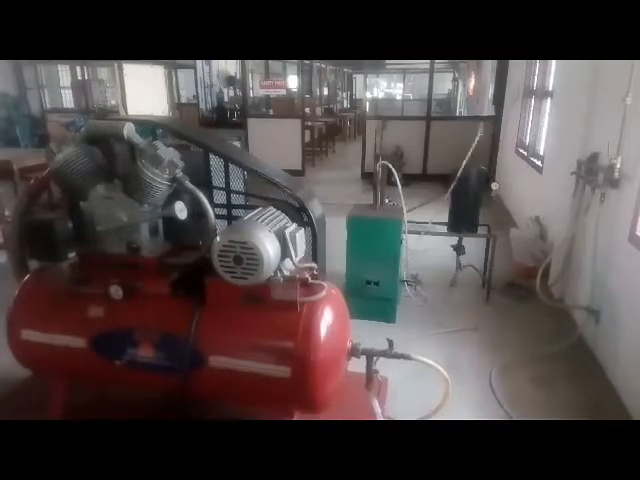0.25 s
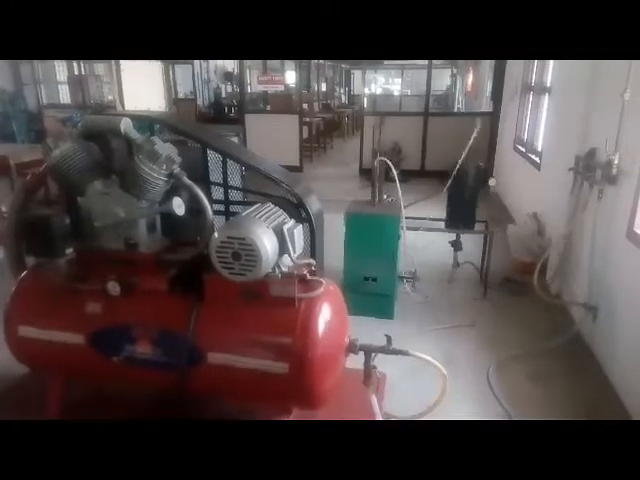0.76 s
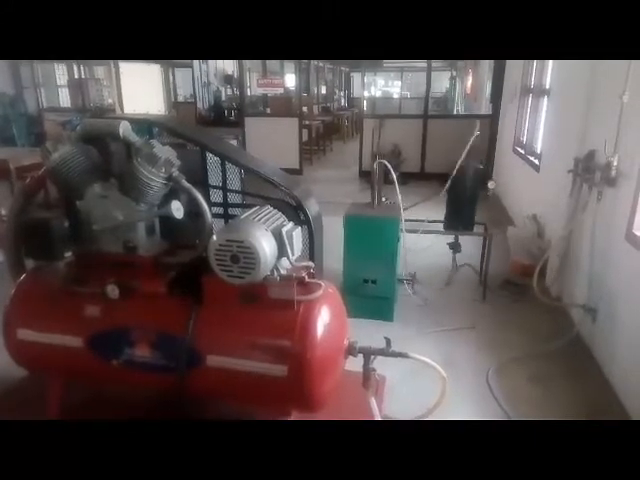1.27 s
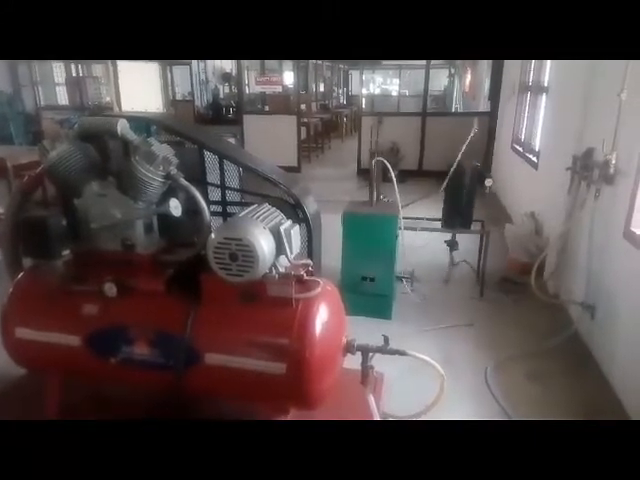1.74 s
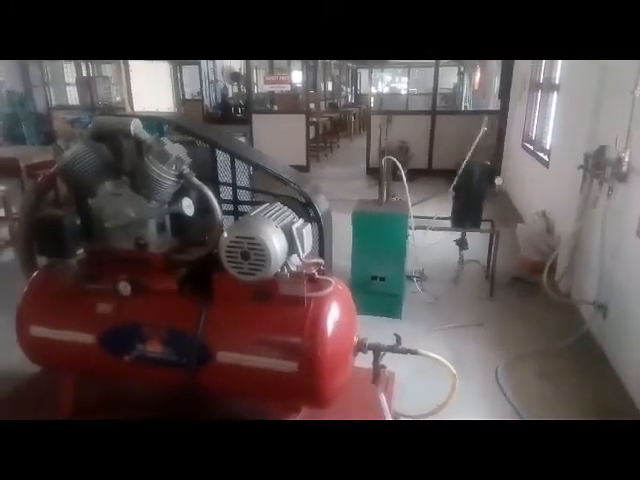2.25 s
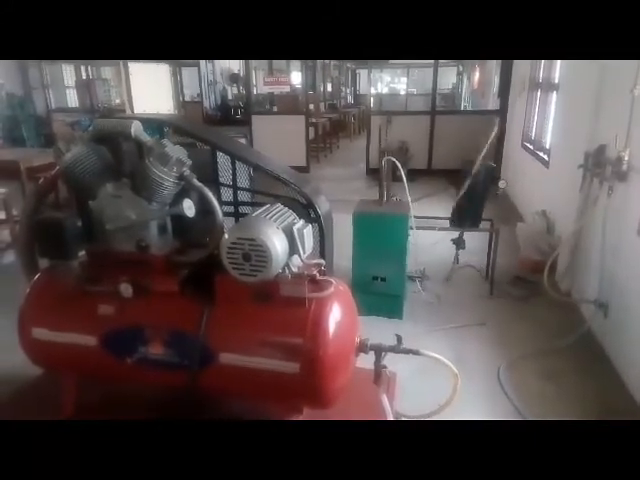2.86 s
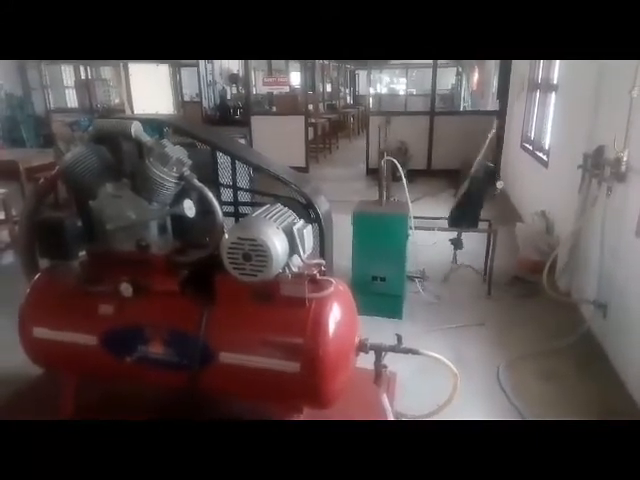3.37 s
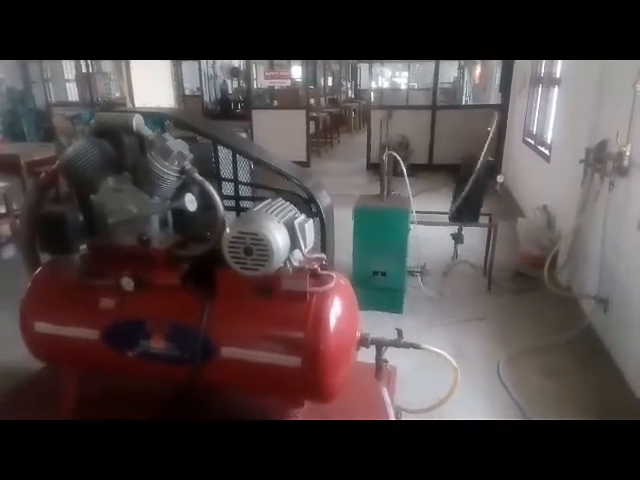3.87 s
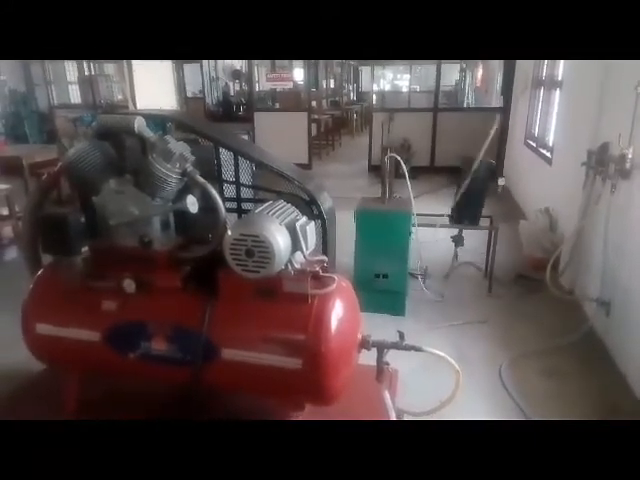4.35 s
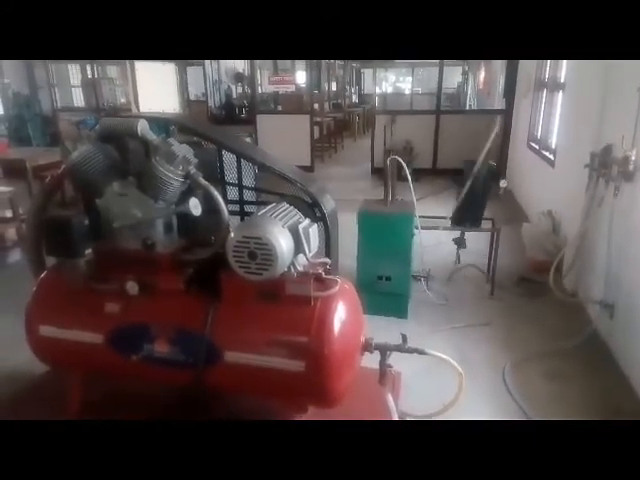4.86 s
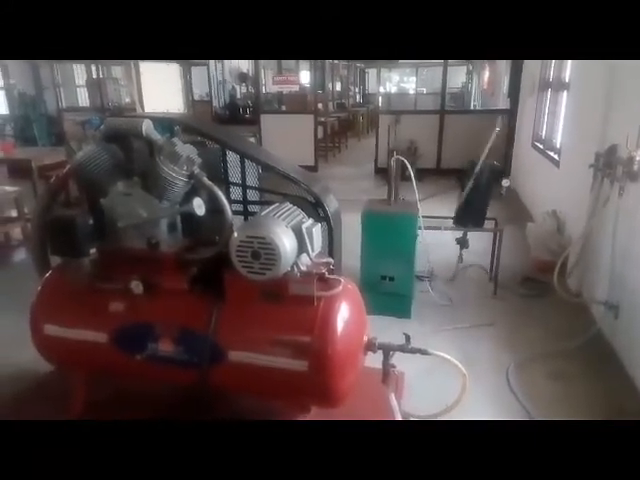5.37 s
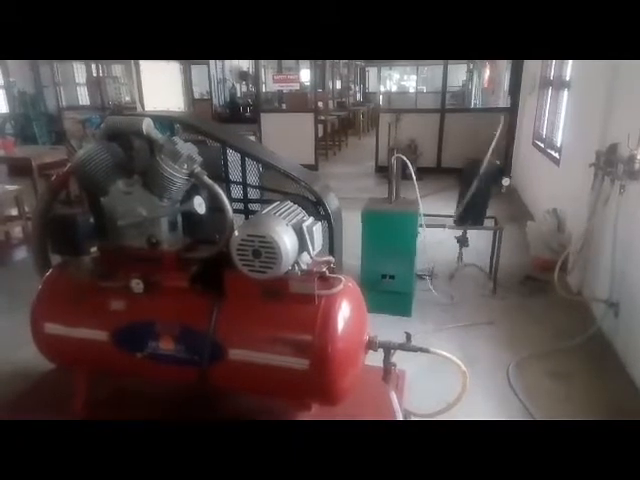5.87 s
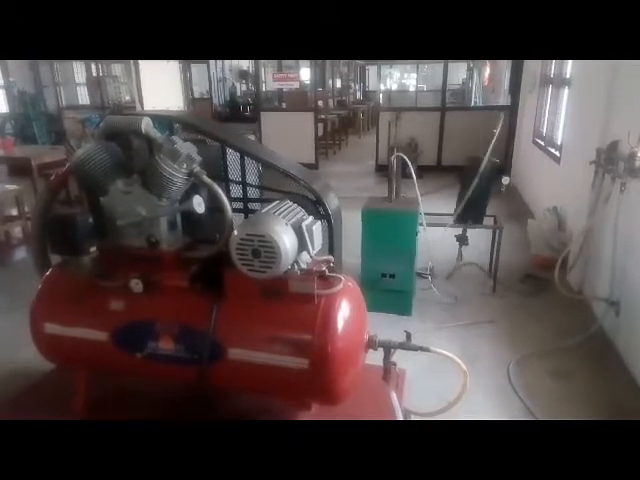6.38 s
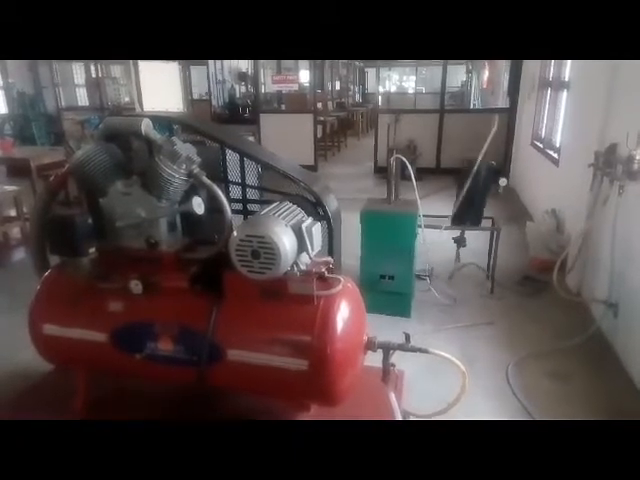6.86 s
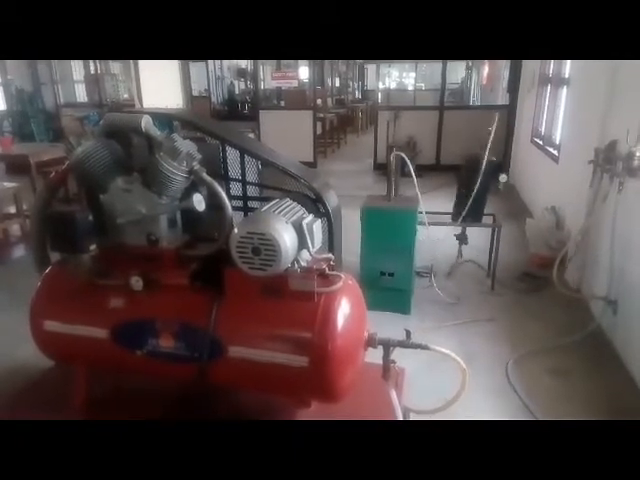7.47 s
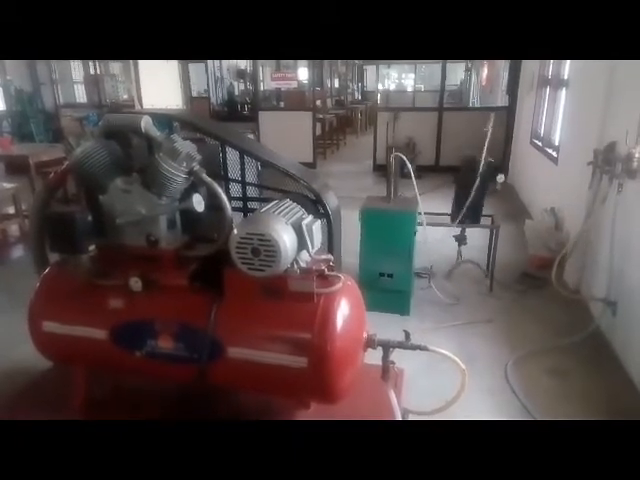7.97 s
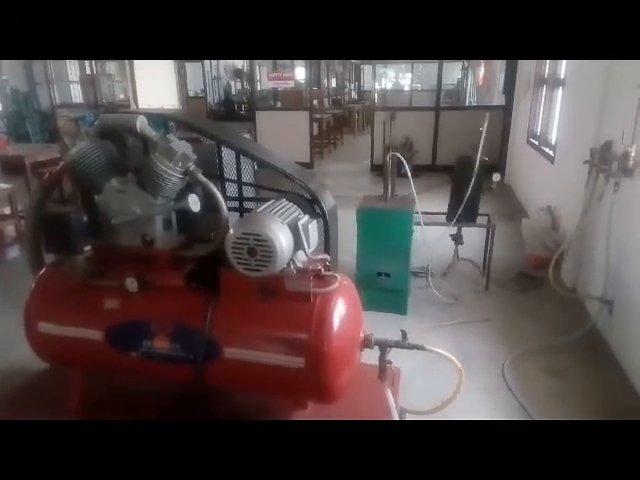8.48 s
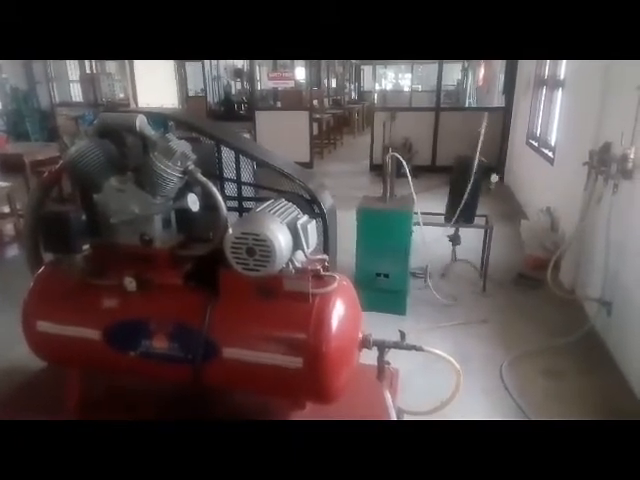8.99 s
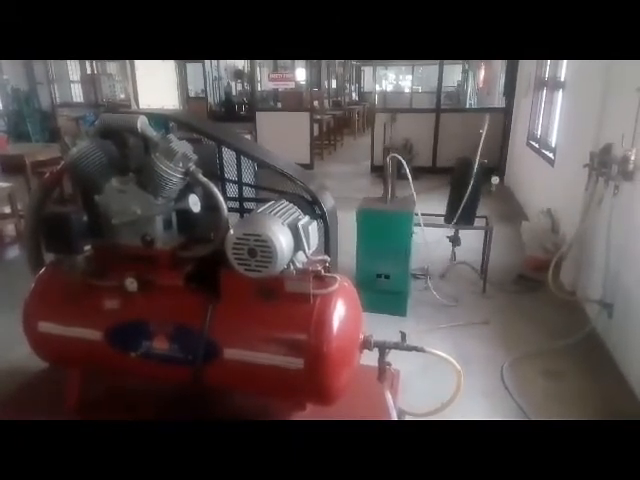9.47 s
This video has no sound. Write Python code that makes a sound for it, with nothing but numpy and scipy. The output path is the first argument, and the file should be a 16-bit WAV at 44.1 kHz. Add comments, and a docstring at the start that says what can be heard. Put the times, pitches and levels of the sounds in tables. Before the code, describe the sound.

Rhythmic metallic clatter from a running air compressor continues throughout, as a loose belt slaps, scuffs and bounces on its guard in an even, repeating pattern. Loose fittings tick and the rubber gives tiny squeaks. A low pulsing hum from the pump and motor and a constant rush of air lie beneath. The microphone is close, with the machine a little to the left, and the clatter echoes off hard walls.

```python
"""In a hard-walled laboratory, a belt-driven piston air compressor runs at a steady speed.
Its slack belt laps twice a second, slapping, knocking and scuffing, so the sheet-metal guard rings.
The pump hums at multiples of its crank speed and throbs against the tone of the motor's fan.
Air rushes through the intake and the fan, and the belt's clatter echoes off the walls."""
import sys
import numpy as np
from scipy import signal
from scipy.fft import rfft, irfft, next_fast_len
from scipy.io import wavfile

SR = 44100
rng = np.random.default_rng(int(sys.argv[2]) if len(sys.argv) > 2 else 0)


def wav_out(sig):
    """Save sig, one row per channel (or a flat mono array), as 16-bit PCM at SR to the path in sys.argv[1]."""
    wavfile.write(sys.argv[1], SR, np.round(np.clip(np.atleast_2d(sig).T, -1, 1) * 32767).astype(np.int16))


N = 429093
FFT_SIZE = next_fast_len(N + 2 * SR, real=True)
HZ = np.maximum(np.arange(FFT_SIZE // 2 + 1) * SR / FFT_SIZE, 1)
TIME = np.arange(N) / SR
SIDES = np.array([[1], [-1]])  # left, right; "pan" is how much louder the left is, "lead" how far ahead

# the belt slaps the guard once a lap:
# (time [s], force [dB], wait for the swing back [s], swing [dB], drag [dB], last brush [dB])
SLAPS = [(0.303, 2.5, 0.054, -1, -3, -12), (0.798, -2, 0.055, -2.5, 0, 1), (1.294, 1, 0.049, -7, 0, -6),
         (1.789, 1.5, 0.067, -6, -1, -6), (2.292, 0.5, 0.055, -3, 0, -8), (2.791, 0, 0.065, -4, -3, 3),
         (3.295, 0, 0.056, -1.5, -5, -6), (3.801, 1, 0.054, -4.5, -10, 9),
         (4.307, -15, 0.063, -5.5, -3, -11), (4.798, 0.5, 0.057, -0.5, 1.5, -1),
         (5.312, -6, 0.089, -7.5, -1, 6.5), (5.819, -3, 0.058, -2.5, 2, -3),
         (6.309, -0.5, 0.062, -6.5, -6, 9.5), (6.816, -5.5, 0.052, -8, 2, -6),
         (7.314, 0.5, 0.056, -3, -2, 2), (7.818, 0, 0.057, -1, -3, 6.5), (8.312, -1, 0.065, -2, 1.5, -10),
         (8.806, -5.5, 0.062, -0.5, -0.5, 3), (9.308, -4, 0.047, -4.5, 1.5, -3)]
# how alike the two ears hear each pitch: (frequency [Hz], likeness [1 or more = the same])
EAR_LIKENESS = [(50, 2), (400, 0.34), (800, 1), (1300, 0), (2200, -0.22), (4500, 0.1), (6500, -0.26),
                (9000, 0.14)]


def belt():
    """The belt's blows and rubbing make the guard ring, hiss, squeak and rattle."""
    slap_blows, slap_rub, slap_ring = slapping()
    knock_blows, knock_rub, knock_ring = knocking()
    rub, hiss = slap_rub + knock_rub
    # hypot adds a faint steady level between the touches
    slips = stick_slip(slips_per_s=1200, spread_db=2.0) * np.hypot(rub, from_db(-29.0))
    ringing = from_db(20.5) * guard(slips, vary_db=3.0)
    ringing += clack(slap_blows + knock_blows, level_db=23.5, vary_db=0.3)
    ringing += groan(rub, pitch_hz=749.7, waver_hz=20, level_db=-3.0, pan_db=4.0)
    hissing = friction(hiss, knock_hiss=knock_rub[1], flicker_db=1.5)
    shaking = from_db(-7.5) * np.hypot(hiss, from_db(-25.5))
    ticking = rattle(shaking, low_hz=1740, high_hz=5440, ring_s=0.0046, spread_db=13.5, count=3000)
    squeaking = squeaks(waver_hz=10, level_db=8.5, pan_db=8.5, lead=0.94)
    return ringing + slap_ring + knock_ring + hissing + ticking + squeaking


def slapping():
    """The belt slaps, swings back, drags and brushes off; gives blows, rubbing and bracket ring."""
    # now and then the rubbing belt catches and snaps against the guard: (time [s], strength [dB])
    snaps = [(0.387, -3.5), (1.586, -5.5), (2.587, 0.5), (3.883, 0), (4.388, -1), (5.098, -3), (5.366, -6),
             (6.106, 0.5), (6.899, -6), (7.372, -1.5)]
    slap_s, force_db, wait_s, swing_db, drag_db, brush_db = np.transpose(SLAPS)
    snap_s, snap_db = np.transpose(snaps)
    swing_s, drag_s, brush_s = slap_s + wait_s, slap_s + 0.0778, slap_s + 0.1363
    slap = touches(slap_s, -16.5, -16.0, rise_s=0.00095, hold_s=0.029, fade_s=0.28)
    swing = touches(swing_s, swing_db - 14, -20.0, rise_s=0.005, hold_s=0.0076, fade_s=0.059)
    drag = touches(drag_s, drag_db - 21, drag_db - 17.5, rise_s=0.0057, hold_s=0.022, fade_s=0.041)
    snap = touches(snap_s, snap_db - 17, snap_db - 17, rise_s=0.0012, hold_s=0.0048, fade_s=0.045)
    brush = touches(brush_s, brush_db - 27, brush_db - 24.5, rise_s=0.0043, hold_s=0.011, fade_s=0.066)
    blows = clicks(slap_s, force_db + 13.5) + clicks(swing_s, swing_db + 12)
    ring = pings(slap_s, -19.0, vary_db=2.5, detune=0.0052)
    ring += pings(swing_s, swing_db - 24.5, vary_db=3.5, detune=0.014)
    ring += pings(snap_s, snap_db - 17.5, vary_db=2.0, detune=0.0029)
    return soften(blows, cutoff_hz=3400), slap + swing + drag + snap + brush, ring


def knocking():
    """The belt grazes, knocks hard, scuffs and bounces; gives blows, rubbing and bracket ring."""
    # short bright knocks, half a lap from the slaps:
    # (time [s], force [dB], brightness [dB], wait for the scuff [s], scuff [dB], bounce [dB])
    knocks = [(0.045, -8.5, -20, 0.057, -6, -1), (0.536, -3, 1, 0.055, 2, -2.5),
              (1.041, -1.5, -1.5, 0.053, 1, 1.5), (1.53, 2.5, 0, 0.053, 2, -3),
              (2.032, -1, 0.5, 0.055, 1, 0.5), (2.537, -11, -3, 0.051, -4, -4),
              (3.035, -1, -1, 0.053, 1, -4), (3.536, -9, -4.5, 0.054, 0, -1.5),
              (4.04, 1, 0.5, 0.056, -3.5, 5), (4.535, -8, -2, 0.05, 3.5, 1),
              (5.043, -1, -1, 0.051, -3, 4.5), (5.556, 0.5, -1, 0.056, 4, -5),
              (6.05, -4, -5, 0.056, -3, -1.5), (6.556, 1, -1, 0.053, 1, -5),
              (7.052, -4, -2, 0.052, -4.5, 5.5), (7.559, -9, -0.5, 0.055, 3, 1.5),
              (8.061, -3, 2, 0.052, 1, -4), (8.544, -18, -2, 0.047, -3, 4),
              (9.05, -5.5, 3, 0.056, -0.5, -1), (9.543, -8, 2, 0.057, 1.5, 0)]
    knock_s, force_db, bright_db, wait_s, scuff_db, bounce_db = np.transpose(knocks)
    scuff_s = knock_s + wait_s
    bounce_s = scuff_s + 0.041
    graze = touches(knock_s - 0.036, -53, -26.0, rise_s=0.012, hold_s=0.028, fade_s=0.04)
    knock = touches(knock_s, force_db - 19, bright_db - 13, rise_s=0.0017, hold_s=0.0066, fade_s=0.088)
    scuff = touches(scuff_s, scuff_db - 14.5, 0.25 * scuff_db - 12.5,
                    rise_s=0.002, hold_s=0.0059, fade_s=0.15)
    bounce = touches(bounce_s - 0.008, bounce_db - 20.5, bounce_db - 22,
                     rise_s=0.0049, hold_s=0.013, fade_s=0.084)
    blows = clicks(knock_s, force_db + 14) + clicks(scuff_s, scuff_db + 6.5)
    blows += clicks(bounce_s, bounce_db + 5)
    ring = pings(knock_s, bright_db - 17, vary_db=3.5, detune=0.0013)
    ring += pings(scuff_s, -19.5, vary_db=2.0, detune=0.0066)
    ring += pings(bounce_s, bounce_db - 27, vary_db=3.5, detune=0.0057)
    return soften(blows, cutoff_hz=7050), graze + knock + scuff + bounce, ring


def touches(starts, rub_db, hiss_db, rise_s, hold_s, fade_s, vary_db=0.7):
    """The belt presses, holds and lets go (60 dB down in fade_s); gives two strengths: rub and hiss."""
    strengths = np.zeros((2, N))
    levels = np.transpose(np.broadcast_arrays(rub_db, hiss_db))
    levels = levels + vary_db * rng.standard_normal((len(starts), 2))
    for start, level_db in zip(starts, levels):
        near = slice(max(int(start * SR), 0), int(start * SR) + SR // 2)
        age = TIME[near] - start
        press = np.clip(age / rise_s, 0, 1)
        let_go = np.exp(-np.log(1000) * np.maximum(age - rise_s - hold_s, 0) / fade_s)
        strengths[:, near] += from_db(level_db)[:, None] * press * let_go
    return strengths


def clicks(starts, blow_db):
    """One click for each blow."""
    return np.bincount((starts * SR).astype(int), from_db(blow_db), N)[:N]


def soften(blows, cutoff_hz):
    """Rubber is soft, so its blows lose their treble."""
    return signal.sosfilt(signal.butter(1, cutoff_hz, fs=SR, output="sos"), blows + 1e-18)


def stick_slip(slips_per_s, spread_db):
    """Rubber grips metal and lets go in small, uneven slips."""
    slips = (rng.random(N) < slips_per_s / SR) * rng.choice([-1, 1], N)
    slips = slips * from_db(spread_db * rng.standard_normal(N))
    return slips / np.std(slips)


def guard(slips, vary_db):
    """Each note of the guard takes a changing share of the slips as the belt lands on other spots."""
    # the panel's ringing notes: (pitch [Hz], width [Hz], level [dB], pan [dB], lead [rad])
    panel_notes = [(719, 15, -5.5, -2, -0.6), (766.4, 17.6, -7, -5, 0), (839, 76, -8.5, 5, -1),
                   (1504, 45, -11, -10, 3), (1548.5, 24.5, -5, 11, 2.5), (1950, 34, -14.5, 13, 6.5),
                   (2310, 30, -13.5, 5, 5), (2637, 68, -9, 11, 0.5), (2737, 54, -14.5, -3, -3.5),
                   (3793, 130, -14, 7, 6), (4390, 29, -8.5, -8, 3.5), (5310, 24, -14, -10, -6)]
    return ring_metal(slips, panel_notes, vary_db, changes_per_s=59)


def clack(blows, level_db, vary_db):
    """Blows ring the guard's stiff frame: a short metal clack, a little different each time."""
    # the frame's ringing notes: (pitch [Hz], width [Hz], level [dB], pan [dB], lead [rad])
    frame_notes = [(783.7, 31, 3.5, 4, 0.48), (1520, 51, -2.5, 5.5, 1.84)]
    return from_db(level_db) * ring_metal(blows, frame_notes, vary_db, changes_per_s=17)


def ring_metal(push, notes, vary_db, changes_per_s):
    """Pushed metal rings at its own notes, each wandering in strength."""
    spectrum = 0
    for note in notes:
        share = from_db(vary_db * drift(changes_per_s))
        spectrum = spectrum + rfft(push * share, FFT_SIZE) * resonances([note])
    return irfft(spectrum, FFT_SIZE)[:, :N]


def pings(starts, level_db, vary_db, detune):
    """Blows ring the guard's steel brackets, at slightly different strengths and pitches each time."""
    # the brackets' ringing notes: (pitch [Hz], time to peak [s], level [dB], pan [dB], lead [rad])
    bracket_notes = [(1975, .005, -14, 7, 1.7), (2270, .008, -6, 5, 2), (2703, 0.0046, -1.5, 14, 2.5),
                     (2796, 0.0031, -0.5, 4, 0), (2880, 0.0037, -5.5, 1, -0.2),
                     (3340, 0.0032, -12, -6, 2.3), (3410, 0.0036, -5, 6, -1), (3840, 0.006, -4.5, -3, -.5),
                     (4180, .006, -3.5, -7, 3), (4350, 0.0079, -4.5, 4, .5), (4650, 0.0045, -5, -4, 1),
                     (5070, 0.0045, -9, 3, -3), (5360, .005, -15, -3, 1), (6200, 0.0033, -10, 3, 2.5)]
    hz, rise_s, note_db, pan_db, lead = np.transpose(bracket_notes)[..., None]
    out, age = np.zeros((2, N + SR)), TIME[:SR // 14]
    envelope = age / rise_s * np.exp(1 - age / rise_s)
    ears = pan(0, pan_db.T) * np.exp(.5j * SIDES * lead.T)
    for start, blow_db in np.broadcast(starts, level_db):
        share, tuning, phase = rng.standard_normal((3, len(hz), 1))
        tones = np.exp(2j * np.pi * (hz * (1 + detune * tuning) * age + phase))
        rings = from_db(blow_db + note_db + vary_db * share) * envelope * tones
        first = int(start * SR)
        out[:, first:first + len(age)] += (ears @ rings).real
    return out[:, :N]


def groan(rub, pitch_hz, waver_hz, level_db, pan_db):
    """While it rubs, the belt chatters on the guard at a rough pitch."""
    angle = 2 * np.pi * np.cumsum(pitch_hz + waver_hz * drift(per_s=160)) / SR
    return pan(level_db, pan_db) * rub * np.sin(angle)


def friction(hiss, knock_hiss, flicker_db):
    """Rubbing makes a grainy hiss, sharpest at the knocks and scuffs."""
    # tone colour of the rubbing: (frequency [Hz], level [dB])
    hiss_colour = [(300, -12.5), (600, -9.5), (1200, 0.5), (1800, 3.5), (2800, 4), (3300, 4), (4200, 4.5),
                   (5200, -3.5), (6400, -1), (7600, -14.5), (10000, -19.5), (14000, -25.5)]
    # sharp treble of the knocks and scuffs: (frequency [Hz], level [dB])
    sizzle_colour = [(2000, -58), (4500, 32), (7000, 24.5), (8000, 3), (9000, 22.5), (9700, 7),
                     (10700, 16.5), (14000, 1)]
    rubbing = stereo_noise(hiss_colour, hiss * from_db(flicker_db * drift(per_s=380)))
    sizzle = stereo_noise(sizzle_colour, knock_hiss * from_db(-6.0 + flicker_db * drift(per_s=130)))
    return rubbing + sizzle


def rattle(shaking, low_hz, high_hz, ring_s, spread_db, count):
    """Loose mesh and fittings tick at random times and pitches, as hard as they are shaken."""
    age = TIME[:512]
    when, pitch, lead, strength = rng.random((count, 4)).T[..., None]
    start = (when * (N - len(age))).astype(int)
    height = shaking[start] * from_db(spread_db * strength ** 3)  # a few ticks stand out
    angle = 2 * np.pi * (low_hz + pitch * (high_hz - low_hz)) * age
    ticks = [height * np.exp(-age / ring_s) * np.sin(angle + side * np.pi * lead) for side in (1, -1)]
    samples = (start + np.arange(len(age))).ravel()
    return np.array([np.bincount(samples, ear.ravel(), N) for ear in ticks])


def squeaks(waver_hz, level_db, pan_db, lead):
    """The rubber sticks and slips at a high, unsteady pitch, heard from the left."""
    # squeaks near the guard's notes: (middle [s], pitch [Hz], level [dB], half length [s])
    belt_squeaks = [(0.307, 2800, -22, 0.009), (0.55, 2680, -20, 0.01), (1.023, 4350, -39, 0.029),
                    (1.058, 2740, -20, 0.011), (1.528, 4360, -30, 0.022), (1.882, 1518, -21, 0.0099),
                    (2.038, 2720, -18, 0.0071), (2.528, 4339, -25, 0.027), (2.541, 1540, -16, 0.0061),
                    (3.04, 2780, -17, 0.009), (3.05, 4335, -33, 0.022), (3.305, 2710, -23, 0.021),
                    (3.54, 1529, -18.5, 0.0073), (4.043, 4360, -28, 0.045), (4.865, 4330, -30, 0.032),
                    (5.398, 2740, -23, 0.014), (6.053, 4340, -38, 0.043), (6.827, 1540, -16.5, 0.012),
                    (7.834, 2670, -16, 0.0058), (8.57, 4340, -32, 0.018), (9.619, 4300, -29.5, 0.033)]
    out = np.zeros((2, N))
    wander = np.cumsum(waver_hz * drift(per_s=350)) / SR
    for middle_s, pitch_hz, peak_db, half_s in belt_squeaks:
        near = np.abs(TIME - middle_s) < half_s
        swell = np.cos(np.pi / 2 * (TIME[near] - middle_s) / half_s) ** 2
        angle = 2 * np.pi * (pitch_hz * TIME[near] + wander[near])
        out[:, near] += pan(peak_db + level_db, pan_db) * swell * np.sin(angle + SIDES * lead / 2)
    return out


def thud(pitch_hz, width_hz, level_db):
    """After each slap the loose stretch of belt flaps with a low thud."""
    slap_s = np.transpose(SLAPS)[0]
    flap, _ = touches(slap_s, -0.5, 0, rise_s=0.005, hold_s=0.11, fade_s=0.18)
    boom = resonances([(pitch_hz, width_hz, 0, 2, 0)]) ** 2
    return from_db(level_db) * filtered(flap * rng.standard_normal(N), boom)


def pump(crank_hz, level_db, pan_db, waver):
    """The piston's strokes hum in wavering tones at multiples of the crank speed."""
    # the tones of the hum: (multiple of the crank speed, level [dB])
    hum_tones = [(3, -64), (4, -57), (6, -54), (8, -49.5), (10, -58), (12, -49), (14, -50.5), (16, -43),
                 (17, -47), (18, -30.5), (19, -50), (22, -37), (23, -41.5), (28, -44), (29, -44.5),
                 (30, -48)]
    crank = 2 * np.pi * crank_hz * TIME
    crank += 0.0035 * np.sin(crank)  # the flywheel slows each time the air is squeezed
    hum = np.zeros(N)
    for multiple, tone_db in hum_tones:
        angle = multiple * crank + 2 * np.pi * rng.random()
        hum += np.sqrt(2) * from_db(tone_db) * (1 + waver * drift(per_s=2.545)) * np.sin(angle)
    return pan(level_db, pan_db) * hum


def motor(tone_hz, level_db, pan_db, waver, lead):
    """The motor's fan sings just off one of the pump's tones, so the hum throbs."""
    # moments when the fan's tone swells: (time [s], rise [dB])
    swells = [(0.95, 13.5), (1.3, 12), (1.72, 14), (2.54, 16), (2.72, 14.5), (3.13, 12.5), (3.8, 10),
              (4.18, 11), (4.67, 11), (4.95, 11), (5.7, 11), (6.25, 7), (7.0, 13), (7.45, 10), (7.82, 11),
              (8.0, 15)]
    swell_db = sum(rise_db * np.exp(-((TIME - peak_s) / 0.073) ** 2) for peak_s, rise_db in swells)
    angle = 2 * np.pi * (tone_hz * TIME + np.cumsum(drift(per_s=4.4)) / SR)
    loudness = pan(level_db + swell_db, pan_db) * (1 + waver * drift(per_s=4.2))
    return np.sqrt(2) * loudness * np.sin(angle + SIDES * lead / 2)


def intake(level_db):
    """Swirling air is sucked in and booms in the tank."""
    # notes of the intake and tank: (pitch [Hz], width [Hz], level [dB], pan [dB], lead [rad])
    tank_notes = [(124.5, 18, -18, -6, -0.2), (185, 10, -28.5, -20, 0.056), (287, 29, 0.5, -0.5, 0.016),
                  (347.8, 7.2, 1, 11, -0.21), (435, 14, -12, 6, .1)]
    return from_db(level_db) * filtered(rng.standard_normal(N), resonances(tank_notes))


def air_rush(level_db, flicker_db):
    """Air and fan make a constant rush whose level flickers quickly."""
    # tone colour of the rush: (frequency [Hz], level [dB])
    rush_colour = [(20, -4), (40, -15), (90, 0), (180, -1.5), (260, -1), (420, 5), (600, 1), (1200, -2),
                   (2300, 10), (3300, -2.5), (4300, 1.5), (6400, 1.5), (8000, -26), (14000, -31)]
    return from_db(level_db) * stereo_noise(rush_colour, from_db(flicker_db * drift(per_s=90)))


def swaying_echo(sound, turns_per_s):
    """The listening point sways between two spots, so the echo's colour keeps shifting."""
    angle = 2 * np.pi * turns_per_s * TIME
    here, there = room_echo(sound, first_echo_s=0.0022), room_echo(sound, first_echo_s=0.0065)
    return np.cos(angle) * here + np.sin(angle) * there


def room_echo(sound, first_echo_s):
    """Hard walls give dense echoes that die sooner in the treble; the bass reaches both ears alike."""
    # how long the room rings: (frequency [Hz], time to fade by 60 dB [s])
    fade_times = [(250, 1.0), (800, 0.88), (1500, 0.82), (3000, 0.91), (6000, 0.55), (12000, 0.15)]
    age, tail = TIME[:SR], 0
    edges_hz = np.geomspace(100, 16000, 9)
    for low, high in zip(edges_hz, edges_hz[1:]):
        centre_hz = np.sqrt(low * high)
        band = signal.butter(2, [low, high], "band", fs=SR, output="sos")
        mid, side = signal.sosfilt(band, rng.standard_normal((2, SR)))
        alike = np.clip(at_hz(EAR_LIKENESS, centre_hz), 0, 1)
        pair = np.sqrt(1 + alike) * mid + SIDES * np.sqrt(1 - alike) * side
        tail = tail + pair * np.exp(-np.log(1000) * age / at_hz(fade_times, centre_hz))
    return filtered(sound, rfft(tail * (age > first_echo_s), FFT_SIZE))


def stereo_noise(colour_table, envelope):
    """Coloured noise, alike in both ears in the bass and nearly unrelated in the treble."""
    # how much louder the left ear hears the noise: (frequency [Hz], pan [dB])
    balance = [(60, 3), (400, 9), (1100, 5), (2300, 6.5), (3200, -0.5), (4500, 6.5), (6300, -3),
               (12000, -0.5)]
    mid, side = rfft(rng.standard_normal((2, N)) * envelope, FFT_SIZE)
    alike = np.clip(at_hz(EAR_LIKENESS, HZ), -1, 1)
    pair = np.sqrt((1 + alike) / 2) * mid + SIDES * np.sqrt((1 - alike) / 2) * side
    pair *= pan(0, at_hz(balance, HZ))
    colour = from_db(at_hz(colour_table, HZ))
    return irfft(pair * colour / np.sqrt(np.mean(colour ** 2)), FFT_SIZE)[:, :N]


def resonances(notes):
    """A left and right filter for an object's ringing notes, each sent out in its own direction."""
    response = 0
    for pitch_hz, width_hz, level_db, pan_db, lead in notes:
        peak = 1 / (1 + 1j * (HZ ** 2 - pitch_hz ** 2) / (HZ * width_hz))
        response = response + peak * pan(level_db, pan_db) * np.exp(.5j * SIDES * lead)
    return response


def filtered(sound, response):
    """Apply a filter, scaled so that white noise would keep its power."""
    average_gain = np.sqrt(np.mean(np.abs(response) ** 2))
    return irfft(rfft(sound, FFT_SIZE) * response / average_gain, FFT_SIZE)[..., :N]


def drift(per_s):
    """A curve gliding between random values of about size 1, per_s of them a second."""
    points = rng.standard_normal(4096)
    return np.interp(TIME * per_s, np.arange(len(points)), points)


def at_hz(table, hz):
    """Read between a table's rows, with octaves evenly spaced."""
    freqs, values = np.transpose(table)
    return np.interp(np.log(hz), np.log(freqs), values)


def pan(level_db, pan_db):
    """Left and right gains, the left louder by pan_db."""
    return from_db(level_db + SIDES * pan_db / 2)


def from_db(db):
    """Turn decibels into a gain."""
    return 10 ** (np.asarray(db) / 20)


def scene():
    """Belt, pump and fan together in the room."""
    clatter = belt()
    hum = pump(crank_hz=15.395, level_db=0.5, pan_db=5.5, waver=0.2) + intake(level_db=-29.5)
    hum += motor(tone_hz=356.3, level_db=-39.5, pan_db=4.5, waver=0.18, lead=-0.69)
    flapping = thud(pitch_hz=181, width_hz=130, level_db=-38.5)
    rush = air_rush(level_db=-25.0, flicker_db=3.54)
    echo = swaying_echo(clatter, turns_per_s=0.4242)
    return from_db(-2.0) * clatter + from_db(-7.0) * echo + flapping + hum + rush


def record(dry):
    """Round off the loudest peaks and cut the highest treble."""
    ceiling, cutoff_hz = 1.33, 14400
    rounded = ceiling * np.tanh(dry / ceiling)
    return signal.sosfilt(signal.ellip(10, .1, 80, cutoff_hz, fs=SR, output="sos"), rounded)


dry = scene()
out = record(dry)
wav_out(out)
```